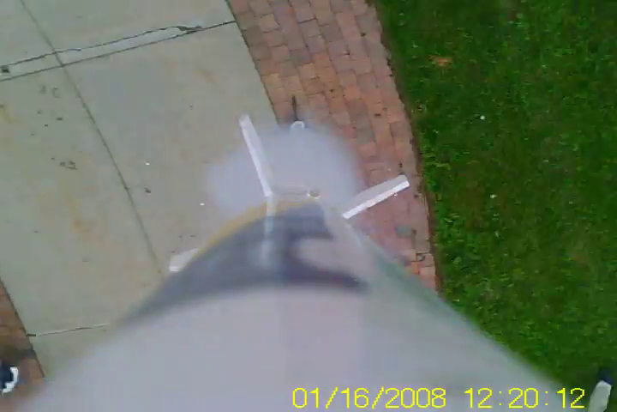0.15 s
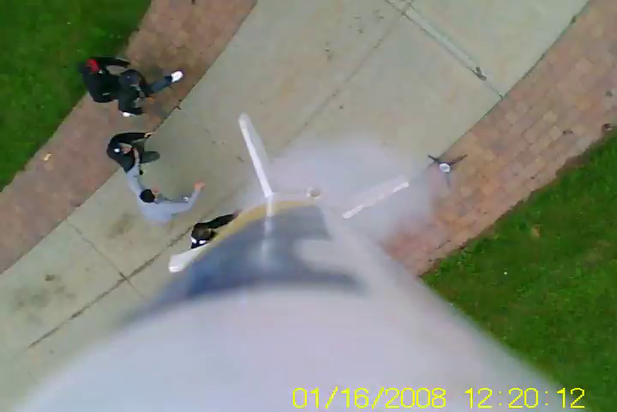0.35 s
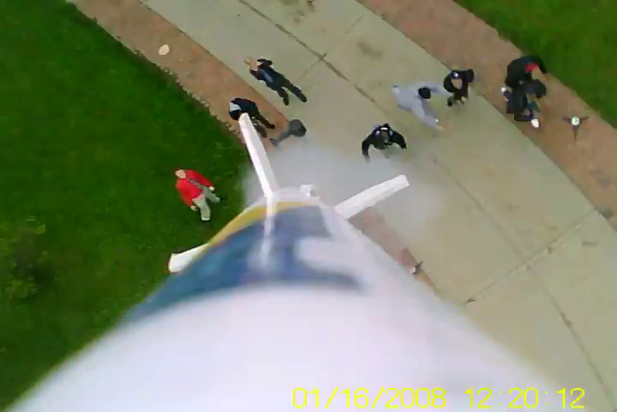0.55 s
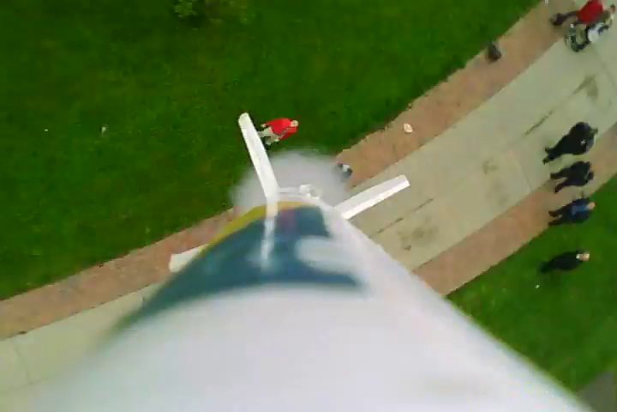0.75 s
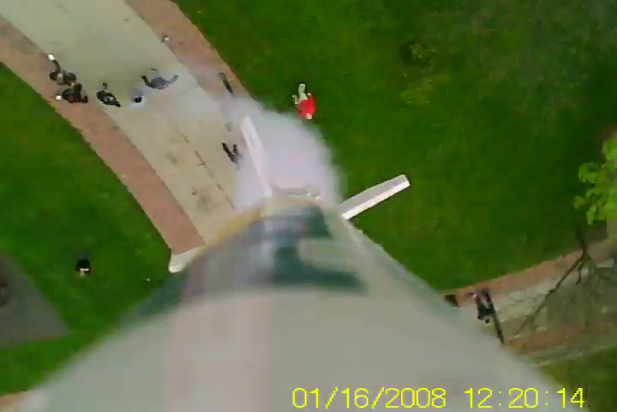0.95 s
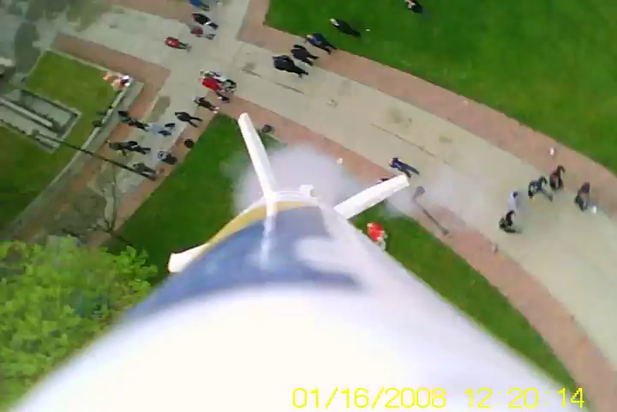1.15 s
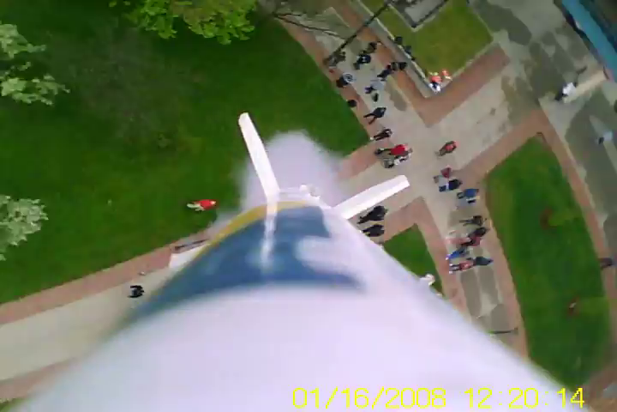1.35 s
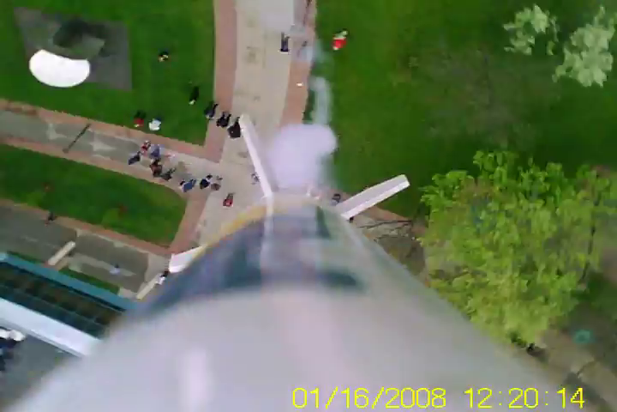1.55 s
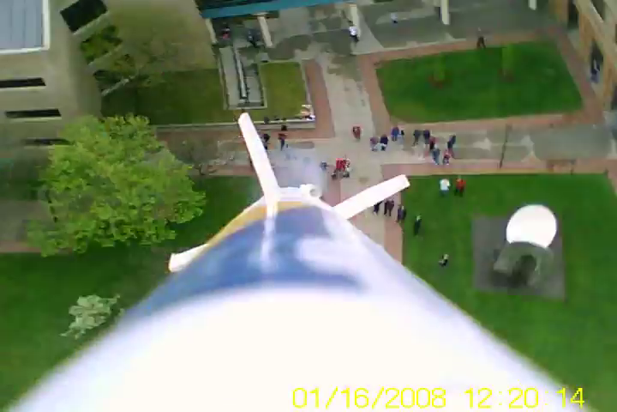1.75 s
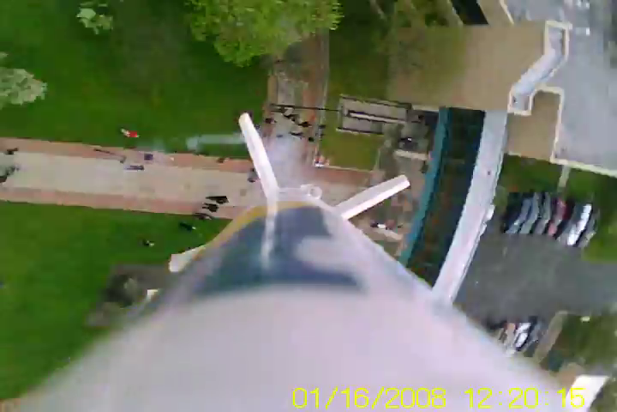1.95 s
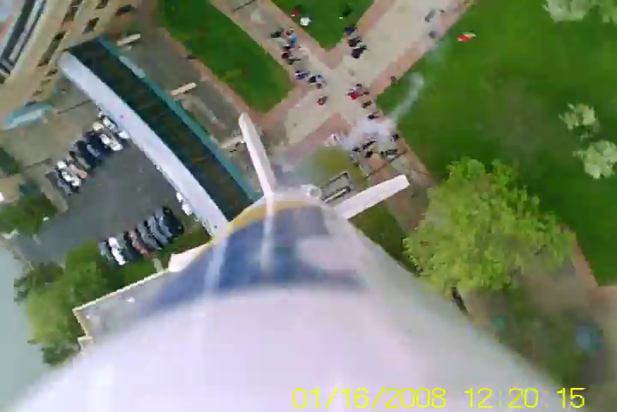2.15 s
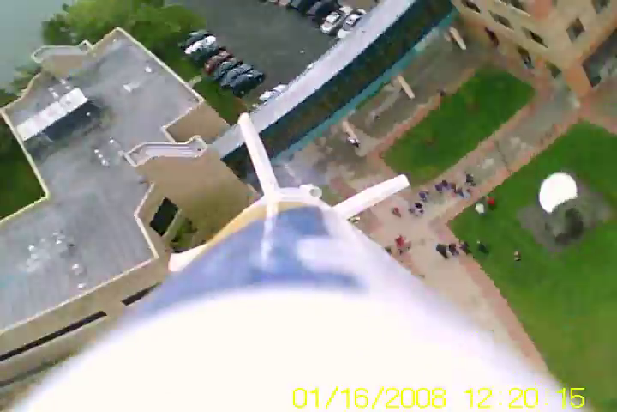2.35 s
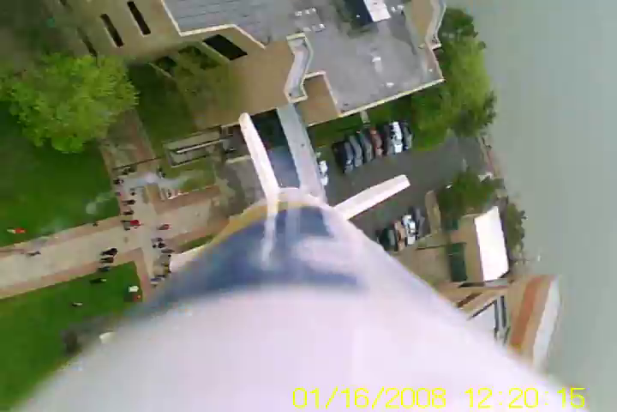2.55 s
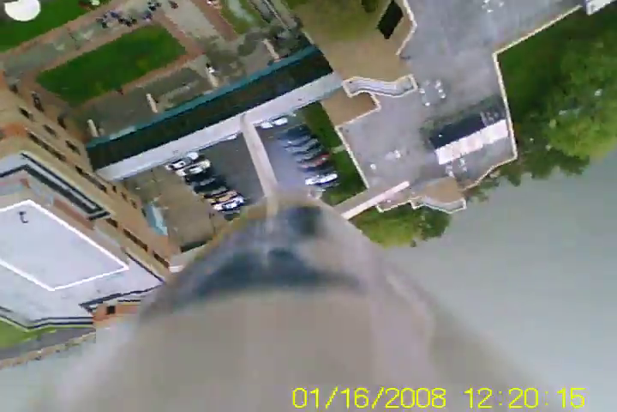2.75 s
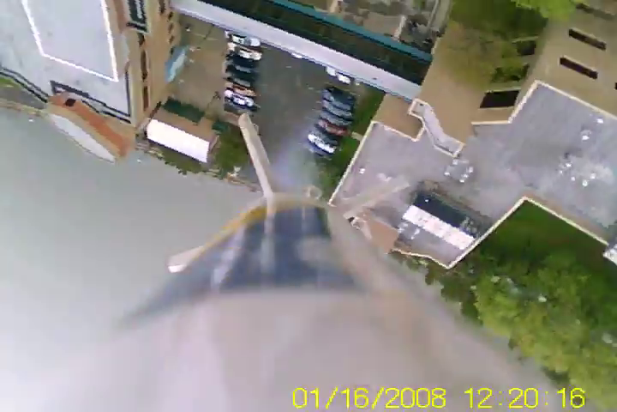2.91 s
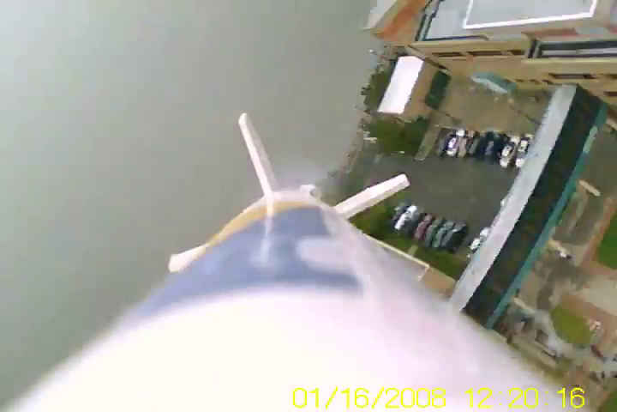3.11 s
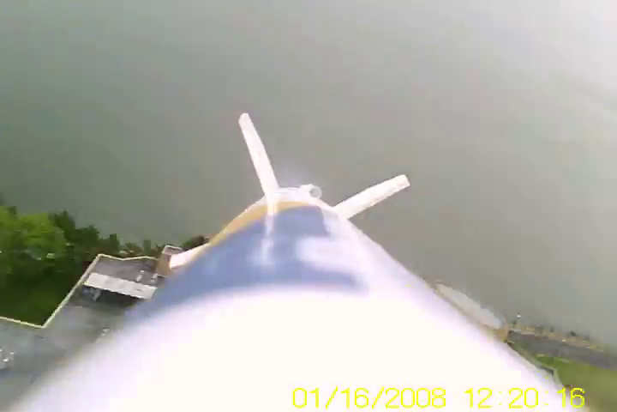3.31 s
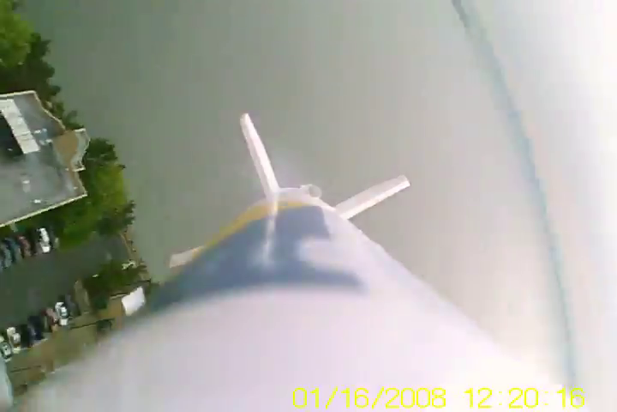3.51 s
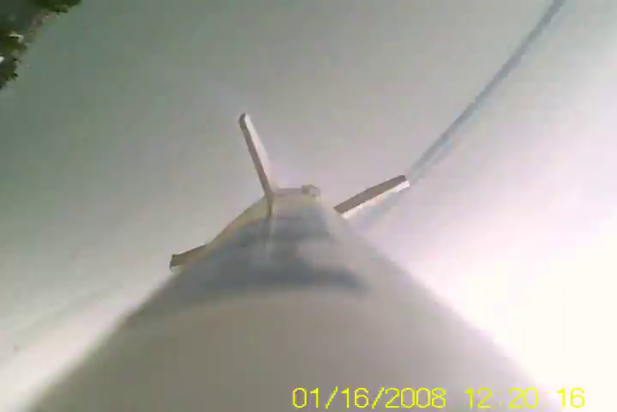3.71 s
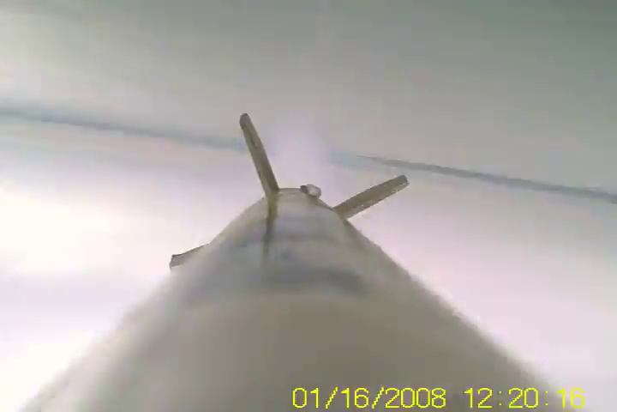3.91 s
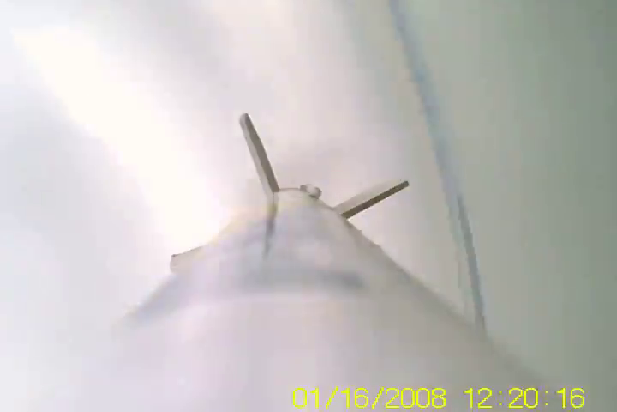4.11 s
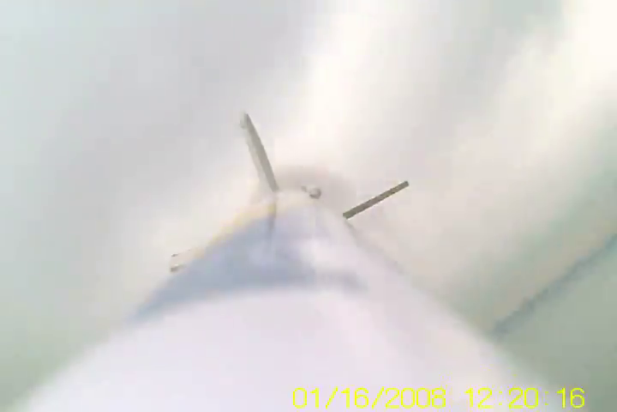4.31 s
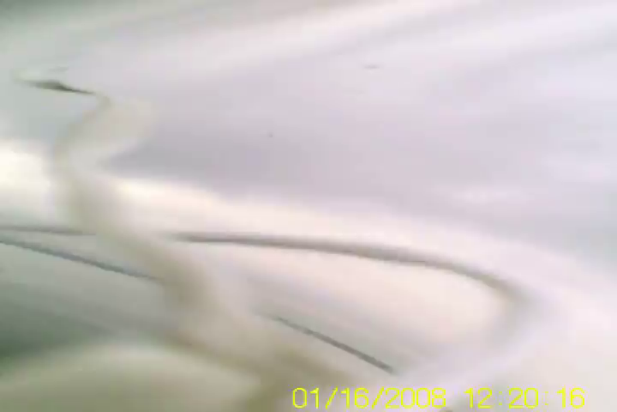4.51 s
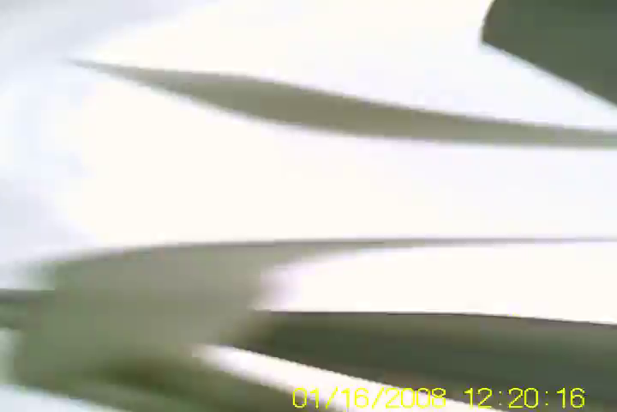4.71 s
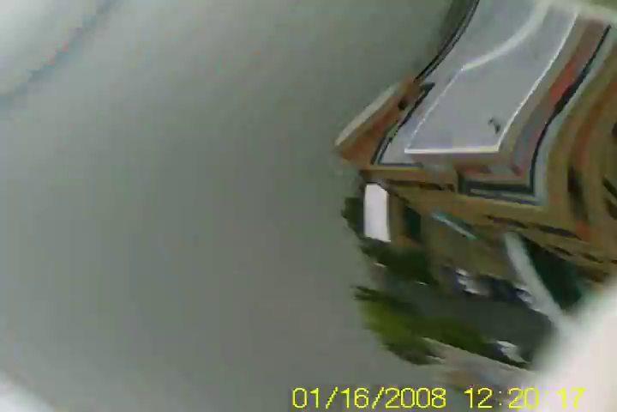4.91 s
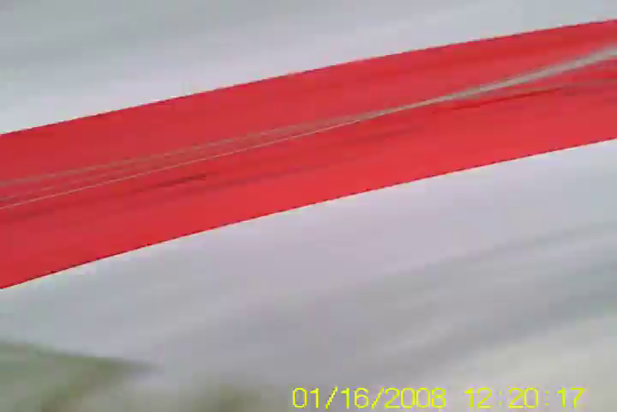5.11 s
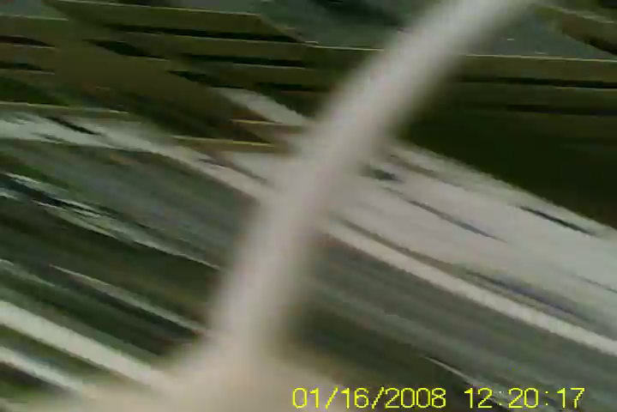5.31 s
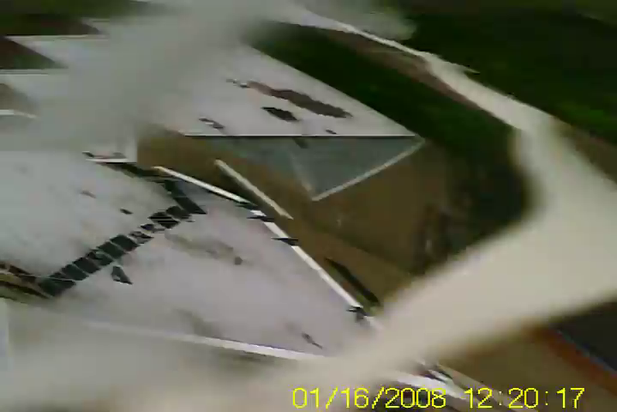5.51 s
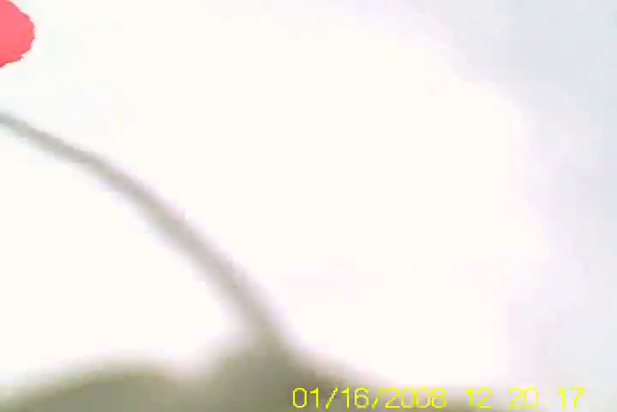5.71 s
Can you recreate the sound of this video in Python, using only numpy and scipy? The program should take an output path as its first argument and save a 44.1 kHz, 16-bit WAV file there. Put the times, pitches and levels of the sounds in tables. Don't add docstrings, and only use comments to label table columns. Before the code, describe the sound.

Loud buffeting wind and a hissing model rocket motor fade as it climbs, then one harsh distorted bang and faint clicks in near quiet.

```python
import sys
import numpy as np
from scipy import signal
from scipy.fft import rfft, irfft
from scipy.io import wavfile
from scipy.ndimage import uniform_filter1d

SR = 44100
rng = np.random.default_rng(int(sys.argv[2]) if len(sys.argv) > 2 else 0)


def decibels_to_gain(level_db):
    exponent = np.asarray(level_db, float) / 20
    return 10 ** exponent


def materialize(psi):
    bounded = np.clip(np.atleast_2d(psi).T, -1, 1)
    quanta = np.round(bounded * 32767).astype(np.int16)
    wavfile.write(sys.argv[1], SR, quanta)


N = 254016
T = np.arange(N) / SR
SETTLED_S = 4.4296


def noise():
    return rng.standard_normal(N)


def colour(x, points):
    hz, db = np.transpose(points)
    f = np.maximum(np.arange(N // 2 + 1) * SR / N, 1)
    gain_db = np.interp(np.log(f), np.log(hz), db, left=-90, right=-120)
    return irfft(rfft(x) * decibels_to_gain(gain_db), N)


def band(x, lo_hz, hi_hz):
    return signal.sosfilt(signal.butter(2, [lo_hz, hi_hz], "bandpass", fs=SR, output="sos"), x)


def unit(x, lo_hz, hi_hz):
    power = np.abs(rfft(x)) ** 2
    in_band = power[int(lo_hz * N / SR):int(hi_hz * N / SR)].sum()
    return x * N / np.sqrt(2 * in_band)


def even(x, span_s):
    k = int(span_s * SR)
    power = uniform_filter1d(uniform_filter1d(x ** 2, k), k)
    return x / np.sqrt(power)


def walk(rate_hz):
    k = int(SR / rate_hz)
    held = np.repeat(rng.standard_normal(N // 40), k)[:N]
    slewed = uniform_filter1d(uniform_filter1d(held, k), k)
    return slewed / slewed.std()


def bell(s, length_s):
    return np.exp(-.5 * ((T - s) / length_s) ** 2)


def course(points):
    return np.interp(T, *np.transpose(points))


# time_s, level_db
THRUST = [
    (0, -35),
    (.55, -37),
    (.9, -38.5),
    (1.2, -50),
    (1.5, -55),
    (2.2, -62),
    (2.8, -74.5),
]
# frequency_hz, level_db per Hz
JET = [(350, -35.5), (600, -9.5), (1010, -4), (1610, -3.5), (1760, -3), (3120, 1), (3960, -4), (4850, 1.5),
       (5800, -7.5), (8270, -10.5), (10100, -18), (11800, -32.5), (12400, -49), (16100, -77), (22000, -120)]


def motor_jet(small_db):
    nozzle = decibels_to_gain(-15) * unit(band(noise(), 4500, 4800), 20, 12000)
    jet = unit(colour(noise(), JET), 2000, 5500) + nozzle
    return jet * decibels_to_gain(course(THRUST) + 0.21 * small_db + 0.64 * walk(30))


# time_s, speed_m_s
AIRSPEED = [(0, 28), (.25, 38.7), (.5, 45), (.75, 53.3), (1.0, 52.8), (1.4, 57.3), (1.75, 49), (2.15, 41.8),
            (2.45, 36.5), (2.9, 27), (3.2, 26), (3.6, 23), (4.3, 24)]


def wind_db(top_db, power):
    return top_db + 20 * power * np.log10(course(AIRSPEED) / 56)


# centre_s, small_eddies_db, large_eddies_db, length_s
GUSTING = [(0.05, -3, 1, .03), (0.134, -10, 0, 0.0051), (0.22, 0, 3, 0.011), (0.347, 2.5, 2, .04),
           (0.447, 1, 10, 0.021), (0.659, 5, 7.5, 0.032), (0.716, -3, 0, 0.015), (0.825, 3.5, 11, 0.022),
           (0.933, 1.5, 9, 0.022), (1.01, 5.5, 9, 0.013), (1.055, 1.5, 4, 0.0082), (1.119, -5, -10, 0.0087),
           (1.156, -0.5, 11.5, 0.014), (1.293, 1, 3, 0.025), (1.374, -0.5, 6.5, 0.017),
           (1.467, 4.5, 4, 0.027), (1.608, 4, 8.5, 0.0086), (1.655, -11, 5.5, 0.011),
           (1.721, 4.5, 1, 0.057), (1.922, 1, 2, 0.011), (2.053, -3, 6, 0.073), (2.191, 2, 5.5, 0.0078),
           (2.383, -1.5, -0.5, .05), (2.428, 3, -5, 0.015), (2.696, -1, 3, 0.019), (2.798, -1, 4.5, .025),
           (2.985, 3, 2.5, 0.035), (3.071, -8, 0, 0.031), (3.2, 0.5, -3, 0.033), (3.998, 4, 0, 0.022)]


def gusting():
    small_db = sum(db * bell(s, length) for s, db, _, length in GUSTING)
    large_db = sum(db * bell(s, length) for s, _, db, length in GUSTING)
    return small_db, large_db


# frequency_hz, level_db per Hz
RUMBLE = [(7.1, -29), (12, 3), (22, 0.5), (59, -1.5), (145, -10), (220, -18.5), (300, -24), (390, -42),
          (660, -120)]
# frequency_hz, level_db per Hz
BUFFET = [(80, -11.5), (200, 1.5), (400, -2.5), (800, -12.5), (1600, -22), (3200, -35.5), (6000, -45)]


def airstream(rumble_db, throb_db, buffet_db):
    packets = 2.0 * walk(45) + 1.7 * walk(110)
    packets = packets - uniform_filter1d(packets, SR // 12)
    large = colour(noise(), RUMBLE) * decibels_to_gain(0.3 * packets + 2.0 * walk(27))
    heave = even(band(large, 14, 62), 0.12)
    throb = even(band(large, 42, 300), 0.05)
    eddies = even(colour(noise(), BUFFET) * decibels_to_gain(packets), 0.054)
    eddies = eddies - 0.23 * band(eddies ** 2, 50, 5000)
    buffet = decibels_to_gain(buffet_db - 0.6) * unit(eddies, 230, 2300)
    return decibels_to_gain(rumble_db) * heave + decibels_to_gain(throb_db) * throb + buffet, packets


def crackle(buffet_db):
    spikes = band(noise(), 900, 4200) * decibels_to_gain(2.9 * walk(160) + 0.49 * walk(30))
    return decibels_to_gain(buffet_db - 17.0) * unit(spikes, 20, 12000)


# frequency_hz, level_db per Hz
STREAM = [(700, -24.5), (1100, -5.5), (2300, -8.5), (3350, -8.5), (3700, -10.5), (4400, -9.5), (4900, -8.5),
          (5400, -14), (6900, -22.5), (8900, -12.5), (10700, -26.5), (11800, -33.5), (12400, -45.5)]
# frequency_hz, width_hz, level_db
PORT = [
    (4074, 170, -2),
    (5874, 247, -6),
]


def boundary_layer(small_db, packets):
    stream = unit(colour(noise(), STREAM), 7800, 16000)
    for hz, width, db in PORT:
        stream = stream + decibels_to_gain(db) * unit(band(noise(), hz - width / 2, hz + width / 2), 20, 12000)
    speed_db = np.interp(T, [0, .6], [-4, -.5])
    level_db = wind_db(-46, 2.514) + 0.055 * small_db + speed_db
    return stream * decibels_to_gain(level_db + 0.073 * packets + 0.44 * walk(11))


# frequency_hz, level_db per Hz
HISS = [(88, -32.5), (150, -9.5), (1080, -19.5), (1170, -17), (2990, -18), (4020, -13.5), (4250, -17.5),
        (7670, -17), (12400, -25), (16100, -65), (22000, -120)]
# pitch_hz, level_db rms
WHINE = [
    (1200, -88.5),
    (3892, -82),
    (4802, -98.5),
    (5599, -90.5),
    (7402, -100.5),
    (7790, -100),
    (9598, -96),
    (10637, -99),
]


def electronics():
    lines = sum(decibels_to_gain(db) * np.sqrt(2) * np.sin(2 * np.pi * hz * T) for hz, db in WHINE)
    return decibels_to_gain(-75.5) * unit(colour(noise(), HISS), 200, 12000) + lines


def fins():
    shed_hz_per_m_s = 30.3
    phase = 2 * np.pi * np.cumsum(shed_hz_per_m_s * course(AIRSPEED)) / SR
    locked = np.interp(T, [.5, .75], [0, 1])
    tone = 0
    for harmonic, top_db, power in [(1, -47, 1.7), (2, -54.5, 0.96)]:
        wave = walk(190) * np.cos(harmonic * phase) + walk(190) * np.sin(harmonic * phase)
        tone = tone + decibels_to_gain(wind_db(top_db, power)) * wave
    return locked * tone


# time_s, level_db
SMOULDER = [
    (1.8, -68),
    (2.9, -54),
    (3.4, -57.5),
    (4.37, -67),
]


def smoulder():
    return decibels_to_gain(course(SMOULDER)) * unit(band(noise(), 2300, 4700), 20, 12000)


# time_s, push in sample units (the converter wraps past .735)
SUCTION = [
    (4.3845, 0),
    (4.3918, -.64),
    (4.3921, 0),
    (4.393, -.1),
    (4.395, -1.1),
    (4.3975, -1.67),
    (4.3987, -2.27),
    (4.3992, -2.17),
    (4.408, -2.17),
]
# full_s, level_rms, rise_s, hold_s, fall_s
PUFFS = [
    (4.391, .17, .0075, .0008, .003),
    (4.3934, .42, .0006, .0038, .0022),
    (4.3992, .006, .0002, .0112, .001),
    (4.4066, .045, .0004, 0, .0006),
    (4.4125, .009, .002, .0165, .0006),
    (4.4255, .018, .003, 0, .004),
]


def ejection():
    gas = 0
    for s, rms, rise, hold, fall in PUFFS:
        gas = gas + rms * np.interp(T, [s - rise, s, s + hold, s + hold + fall], [0, 1, 1, 0]) ** 2
    pinned = T - SUCTION[-2][0]
    freed = T - SUCTION[-1][0]
    ring = .45 * np.sin(np.pi * 270 * pinned) ** 2 * np.exp(-np.abs(pinned) / .003)
    push = course(SUCTION) + (ring - 2 * gas) * (pinned > 0)

    def sag(late_s):
        hold_s, decay_s = .0026, .0085
        return np.exp(-np.maximum(late_s - hold_s, 0) / decay_s)

    rest = sag(SETTLED_S - SUCTION[-1][0])
    back = .71 * np.maximum(sag(freed) - rest, 0) / (1 - rest)
    gas_spectrum = [(300, -3.5), (2500, -2.5), (4800, 4.0), (6800, -9.5), (9000, -2.5), (11500, -22.0)]
    rasp = unit(colour(noise(), gas_spectrum), 20, 9800)
    return np.where(freed > 0, back, push) + gas * rasp


# centre_s, buffet_db, length_s
TUMBLE = [(4.433, -44.5, 0.016), (4.496, -65.5, 0.02), (4.58, -59.5, .005), (4.639, -64.5, .008),
          (4.7, -65.5, 0.04), (4.785, -60.5, .03), (4.826, -61, 0.0087), (4.916, -80, .008),
          (5.003, -68.5, 0.0088), (5.051, -66, 0.012), (5.128, -79, 0.02), (5.254, -76, 0.0099),
          (5.358, -80, 0.019)]


def tumbling(lift_db, still_db):
    gusts = sum(decibels_to_gain(db) * bell(s, length) for s, db, length in TUMBLE)
    return 20 * np.log10(gusts * decibels_to_gain(lift_db) + decibels_to_gain(still_db))


# start_s, peak_db, pitch_hz, thud_db
SNAPS = [(4.4554, -62, 3200, 5), (4.4747, -54, 3920, -14), (4.494, -63, 3860, 1),
         (4.6268, -40, 4500, -10.5), (4.655, -53, 2980, -18), (4.681, -44.5, 4420, -18),
         (4.7114, -67, 2610, 7), (4.7399, -28, 4200, -1), (4.8158, -51, 4930, -4),
         (4.8214, -31, 4800, -14.5), (4.833, -42.5, 3900, -19), (4.9494, -51.5, 3240, -17.5),
         (5.006, -51, 3830, -20), (5.0674, -50.5, 5390, -25), (5.1006, -44.5, 3870, -18),
         (5.123, -55, 4770, -9)]
# start_s, peak_db, pitch_hz, thud_db
BUMPS = [(4.441, -54, 2810, -0.5), (4.511, -67, 3870, 2), (4.577, -51, 4160, -9), (4.6417, -65, 3880, 5.5),
         (4.7024, -58, 3190, 0), (4.755, -53, 2790, 4), (4.764, -49, 4740, 0), (4.9284, -65, 3270, -27),
         (4.9768, -50, 4500, -14), (5.113, -57, 4690, -12), (5.1374, -60, 3880, -18),
         (5.1773, -66, 3890, -16.5), (5.2906, -66.5, 3900, -18.5), (5.3958, -56, 3640, -26)]


def knocks():
    out = np.zeros(N + 4096)
    t = np.arange(4096) / SR
    rows = [r + (-10.5, 0.018) for r in SNAPS] + [r + (-16.5, 0.027) for r in BUMPS]
    for s, db, hz, thud_db, top_db, t60 in rows:
        rattle = rng.standard_normal(4096) * np.minimum(t / 0.0015, 1) * 1000 ** (-t / t60)
        tick = band(rattle * np.exp(-t / 0.0011), 900, 8900)
        parts = [(band(rattle, hz * .62, hz * 1.27), 0), (band(rattle, 6000, 8800), top_db),
                 (band(rattle, 680, 3000), thud_db + 3.5), (tick, -6.5)]
        i = int((s - .0008) * SR)
        out[i:i + 4096] += sum(decibels_to_gain(db + gain_db) * part / np.abs(part).max() for part, gain_db in parts)
    return out[:N]


# centre_s, peak_db, length_s
SWINGS = [(4.491, -39, 0.027), (4.581, -40.5, 0.0073), (4.654, -37.5, 0.023), (4.705, -34.5, 0.0096),
          (4.776, -40, 0.05), (4.854, -46.5, 0.021), (5.038, -50, 0.0079), (5.089, -43, 0.027),
          (5.240, -53, 0.014), (5.290, -57, 0.024), (5.476, -65, 0.012), (5.521, -68.5, .010),
          (5.607, -62, 0.0076), (5.656, -70, 0.024)]


def swings():
    out = np.zeros(N)
    for s, db, length in SWINGS:
        u = (T - s) / (.5 * length)
        out += decibels_to_gain(db) * u * np.exp(.5 - .5 * u ** 2)
    return out


def scene():
    climbing = T < SETTLED_S
    small_db, large_db = gusting()
    rumble_db = np.where(climbing, wind_db(-21.5, 1.09) + large_db, tumbling(9, -80))
    throb_db = np.where(climbing, wind_db(-22, 1.47) + 0.74 * large_db + 0.55 * small_db, rumble_db - 1)
    flutter_db = 0.72 * walk(38.05)
    buffet_db = np.where(climbing, wind_db(-27, 2.32) + small_db + flutter_db, tumbling(0, -95))
    air, packets = airstream(rumble_db, throb_db, buffet_db)
    thin = motor_jet(small_db) + boundary_layer(small_db, packets) + fins() + smoulder()
    free = np.interp(T, [4.378, 4.388, 4.428, 4.440], [1, 0, 0, 1])
    stiff = .6
    wind = free * (stiff * np.tanh(air / stiff) + crackle(buffet_db) + thin * climbing)
    offset = np.where(climbing, .0035, -.0035)
    return (wind + electronics() + ejection() + knocks() + swings() + offset)[None]


def roll_off(x):
    return signal.sosfilt(signal.butter(12, 17040, fs=SR, output="sos"), x)


def record(dry):
    full_scale = .735
    wrapped = (dry + full_scale) % (2 * full_scale) - full_scale
    slow = signal.sosfiltfilt(signal.butter(7, 11700, fs=SR, output="sos"), wrapped)
    overloaded = (wrapped != dry).any(axis=0)
    leak = (wrapped - slow) * overloaded * (np.abs(T - 4.4) < .012)
    held = np.clip(slow, -.76, .78) + decibels_to_gain(-20.5) * leak
    edge = signal.ellip(11, 1, 85, 16150, fs=SR, output="sos")
    return roll_off(signal.sosfilt(edge, held))


dry = scene()
out = record(dry)
materialize(out)
```